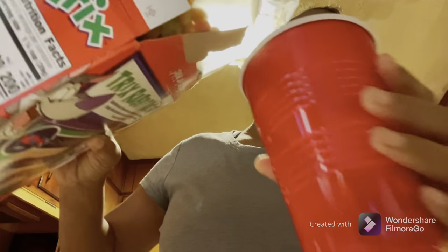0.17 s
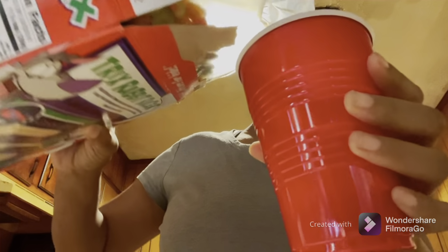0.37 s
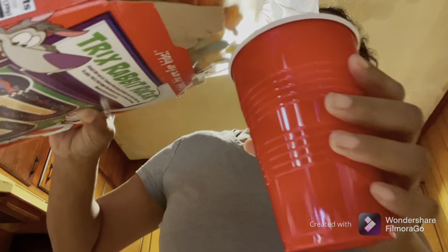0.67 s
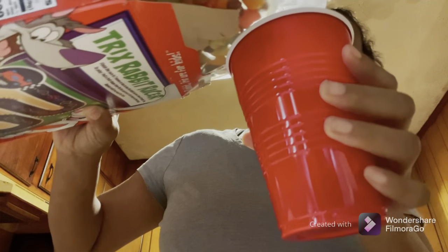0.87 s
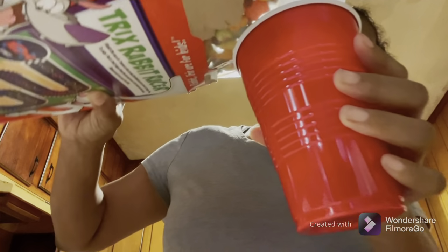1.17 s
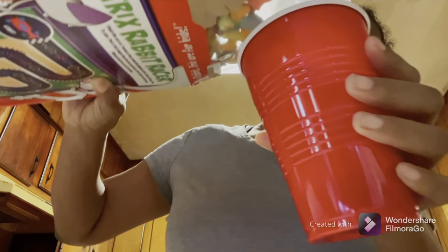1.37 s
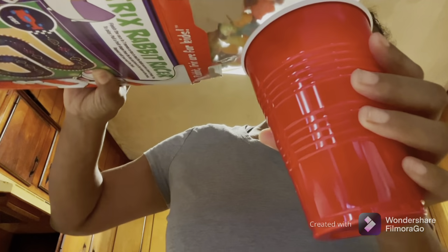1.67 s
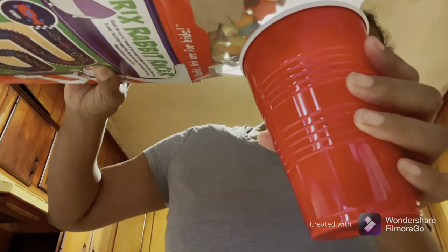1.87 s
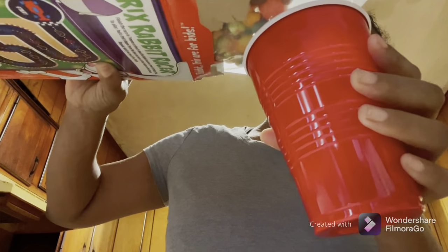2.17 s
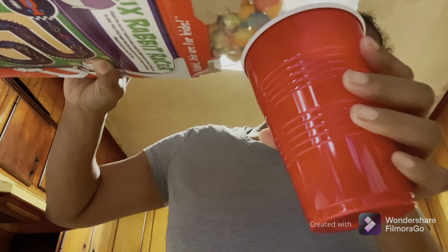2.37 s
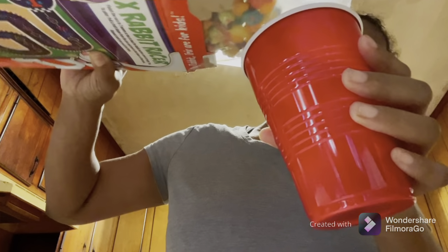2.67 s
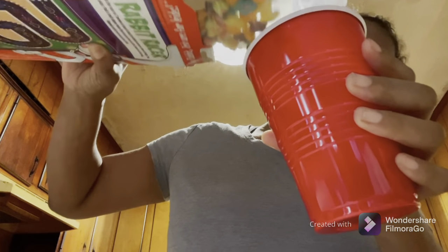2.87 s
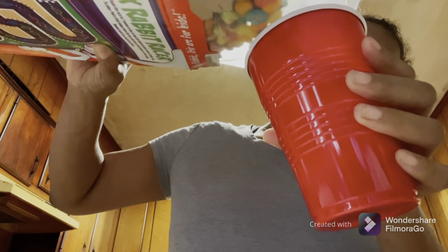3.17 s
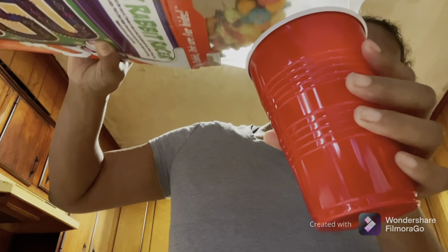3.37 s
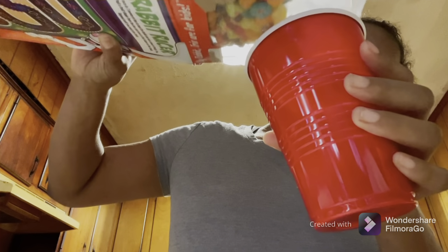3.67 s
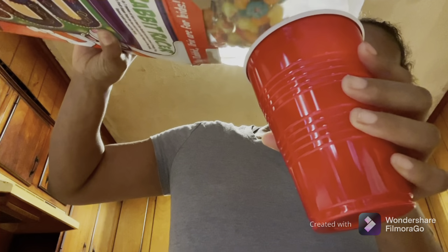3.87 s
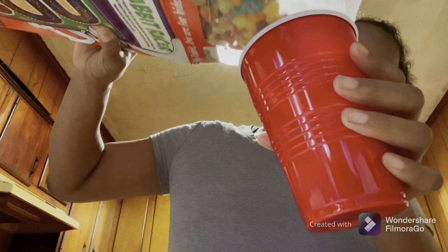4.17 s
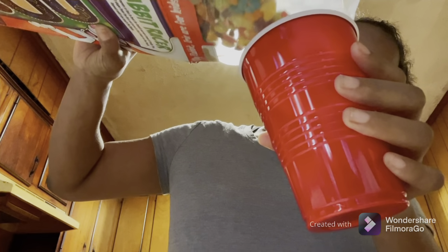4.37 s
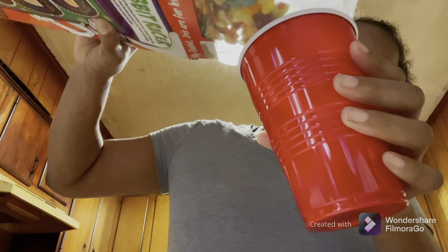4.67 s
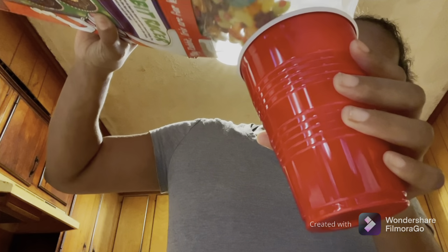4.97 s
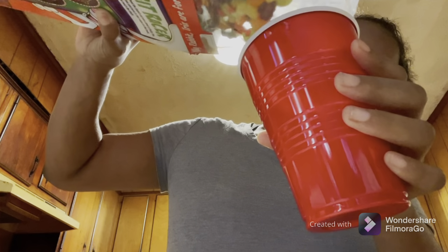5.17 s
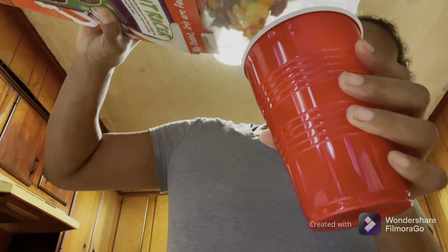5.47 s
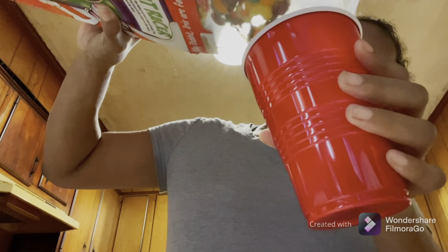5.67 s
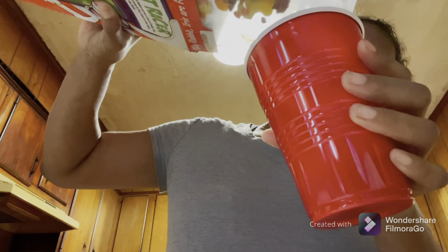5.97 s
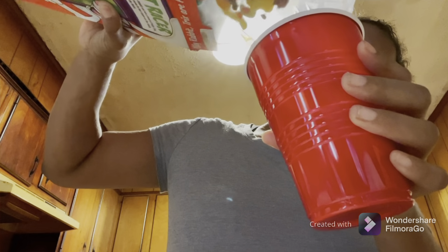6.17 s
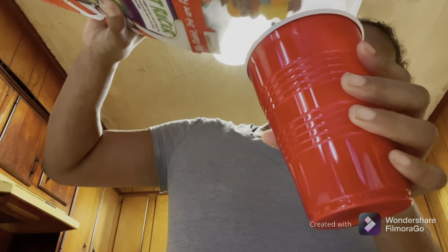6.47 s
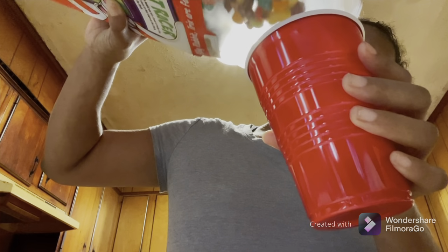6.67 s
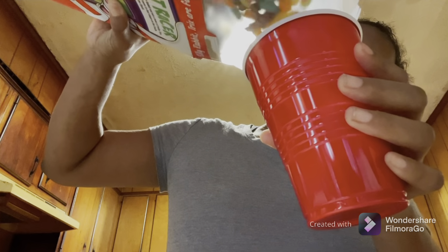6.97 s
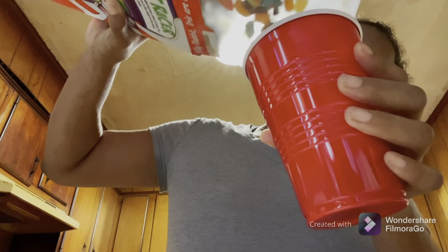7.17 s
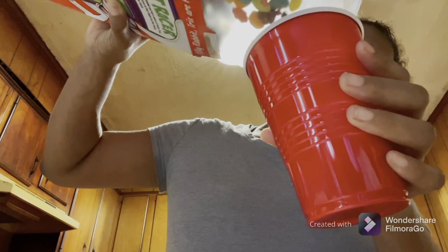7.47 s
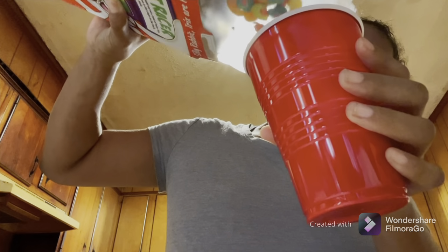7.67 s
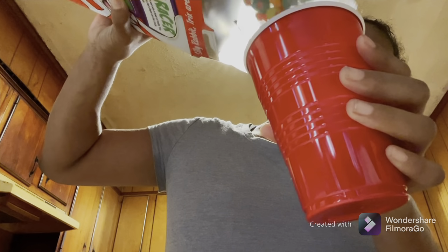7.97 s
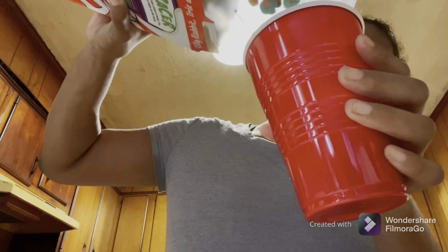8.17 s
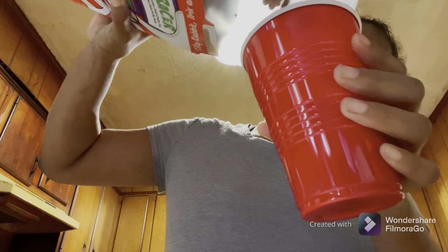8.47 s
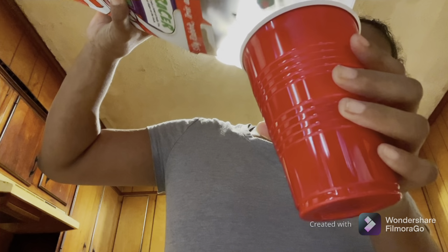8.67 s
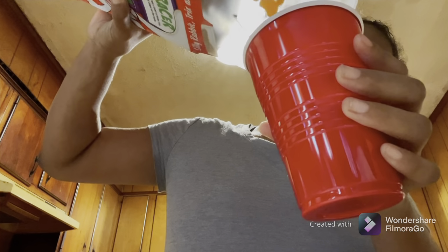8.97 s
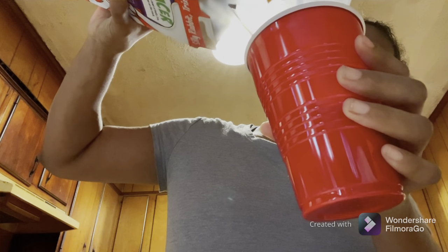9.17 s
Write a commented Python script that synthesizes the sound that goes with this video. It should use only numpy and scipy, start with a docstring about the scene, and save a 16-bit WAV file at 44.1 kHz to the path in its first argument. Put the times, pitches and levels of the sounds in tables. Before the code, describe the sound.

Soft, grainy slides of dry cereal in cardboard come first, with pauses between. Then a few pieces hit an empty plastic cup, hollow and bright, pause briefly, and pour in thick clattering bursts. The sound turns duller and drier on the growing heap, thinning to a quieter uneven trickle while the plastic liner rustles and cracks. Close stereo microphone, pour leaning right, short kitchen reflections, low hum underneath.

```python
"""Cereal pours from a tipped box into a thin plastic cup, close to the microphone.
Each piece is a burst of tiny cracks plus the ringing cup; as the heap grows, the ring fades to dry clicks.
Small pieces patter along. Before the pour, the box tips in short and long slides of filtered noise.
The liner rustles (grainy noise) and snaps (short cracks), in a small kitchen with still air and a low hum."""
import sys
import numpy as np
from scipy import signal
from scipy.fft import rfft, irfft, next_fast_len
from scipy.io import wavfile
from scipy.ndimage import uniform_filter1d

SR = 44100
rng = np.random.default_rng(int(sys.argv[2]) if len(sys.argv) > 2 else 0)


def digitize_waveform(pressure):
    """Quantize a signal to 16-bit integers and store it at the path in sys.argv[1].

    Rows of a 2-D input are taken as channels; values are limited to [-1, 1].
    """
    field = np.atleast_2d(pressure).T
    bounded = np.clip(field, -1, 1)
    quanta = np.round(bounded * 32767).astype(np.int16)
    wavfile.write(sys.argv[1], SR, quanta)


N = 411012
TIME = np.arange(N) / SR  # seconds

# Strength of the pour over time, before the trims in the functions that use it:
# t/s, rumble level/dB, crinkle level/dB
FLOW = [(3.03, -45, -54), (3.14, -40, -61), (3.27, -44, -40), (3.48, -39, -44.5), (3.69, -42.5, -55.5),
        (4.1, -51.5, -62.5), (4.28, -41, -49.5), (4.4, -41, -43.5), (4.9, -38.5, -45), (5.02, -41.5, -44),
        (5.25, -34, -36), (5.56, -40, -57), (5.66, -32.5, -37.5), (6.05, -37.5, -39.5), (6.32, -43.5, -51),
        (6.7, -51, -59), (6.92, -44.5, -56.5), (7.2, -32.5, -37.5), (7.38, -38.5, -44),
        (7.52, -32.5, -35.5), (7.72, -47, -58), (7.98, -42, -52), (8.24, -35.5, -43), (8.54, -42, -50),
        (8.8, -37, -44), (9.32, -46, -51)]
POUR_START_S = FLOW[0][0]


def amp(db):
    """Turns decibels into gain."""
    return 10 ** (np.asarray(db) / 20)


def unit(x):
    """Scales a sound to rms 1."""
    return x / np.sqrt(np.mean(x ** 2) + 1e-20)


def peak(x, size=132):
    """Finds the rms of the loudest three milliseconds of each row."""
    power = uniform_filter1d(x ** 2, size, axis=1, mode="constant")
    return np.sqrt(power.max(1, keepdims=True) + 1e-20)


def read(points, hz):
    """Reads a curve between its points, along a log-frequency axis."""
    f, value = np.transpose(points)
    return np.interp(np.log(hz + 1), np.log(f + 1), value)


def add(mix, s, sound):
    """Adds a sound to the stereo mix at time s, cutting off what runs past the end."""
    part = mix[:, max(round(s * SR), 0):][:, :sound.shape[1]]
    part += sound[:, :part.shape[1]]


def colour(x, points, size=2048):
    """Filters each row to the given spectrum, with no sound ahead of its cause (minimum phase)."""
    hz = abs(np.fft.fftfreq(size, 1 / SR))
    log_gain = np.log(amp(read(points, hz)))
    response = np.exp(np.conj(signal.hilbert(log_gain)))
    taps = np.fft.ifft(response).real[:size // 2]
    return signal.oaconvolve(x, taps[None], axes=1)[:, :x.shape[1]]


def band(x, edges, kind="band", order=4):
    """Keeps one range of frequencies with a Butterworth filter."""
    return signal.sosfilt(signal.butter(order, edges, kind, fs=SR, output="sos"), x)


def background(air_db=-56, waver=0.33, apart=0.97):
    """Still air is coloured noise; an appliance hums in low tones that waver in level and phase."""
    # colour of the kitchen air: f/Hz, level/dB
    air_colour = [(26, -51), (45, -3), (58, -5), (80, -4.5), (120, -11), (250, -16.5), (500, -18),
                  (1000, -29), (1500, -35), (2000, -43), (2600, -47), (5000, -42), (10000, -51),
                  (16000, -53)]
    # low hum: f/Hz, level/dB
    hum_tones = [(59.3, -53.5), (120, -65.5), (240.5, -63)]
    noise = rng.standard_normal((3, N))
    shared_and_separate = noise[0] + apart * noise[1:]
    out = amp(air_db) * unit(colour(shared_and_separate, air_colour, size=16384))
    knots = np.arange(0, TIME[-1] + 1, .1)  # a new drift target every 0.1 s
    for hz, db in hum_tones:
        targets = rng.standard_normal(len(knots)) + 1j * rng.standard_normal(len(knots))
        drift = np.interp(TIME, knots, targets)
        tone = ((1 + waver * drift) * np.exp(2j * np.pi * hz * TIME)).real
        out = out + amp(db) * unit(tone)
    return out


def kitchen(pair, room_db, first_s=0.0053, absorb_hz=8000, size=20000):
    """Dense reflections off cupboards and walls differ at each port; treble is softened as well."""
    # time for the echoes to die by 60 dB: f/Hz, t60/s
    decay_times = [(200, 0.067), (800, 0.12), (4000, 0.15), (12000, 0.085)]
    echo_here = rng.standard_normal((2, size))
    taps = echo_here * (rng.random((2, size)) < 3000 / SR) * (np.arange(size) > first_s * SR)
    hz, t, z = signal.stft(taps, SR, nperseg=128)
    fade = amp(-60 * t / read(decay_times, hz)[:, None])
    tail = signal.istft(z * fade, SR, nperseg=128)[1]
    tail = band(tail / np.linalg.norm(tail, axis=1, keepdims=True), absorb_hz, "low", order=1)
    return pair + amp(room_db) * signal.oaconvolve(pair, tail, axes=1)[:, :N]


def ports(pair, shade=1):
    """Sound from the side reaches the right microphone port sooner and louder; shade scales the dB gap."""
    # phase by which the left port leads (negative: it lags): f/Hz, phase/rad
    port_phase = [(20, 0), (600, -.7), (950, -1.65), (2070, -2.8), (3400, -5.3), (4650, -5.9), (5500, -8.6),
                  (7500, -9.1), (11300, -6.5), (13700, -6.1), (16400, -3.6)]
    # left minus right, before shade: f/Hz, level/dB
    port_balance = [(60, 0), (200, -5), (380, -7.5), (700, -6), (1290, -6.2), (2380, -2), (4400, -4),
                    (8100, -1), (15000, 0)]
    hz = np.fft.rfftfreq(next_fast_len(N + 4096), 1 / SR)
    size = 2 * (len(hz) - 1)
    ratio = amp(shade * read(port_balance, hz))
    left = ratio * np.exp(1j * read(port_phase, hz))
    right = np.ones(len(hz))
    gains = np.array([left, right]) * np.sqrt(2 / (1 + ratio ** 2))  # keeps the total power
    return irfft(rfft(pair, size) * gains, size)[:, :N]


def grains(per_s, spread_db, hiss, grain_s, size=600):
    """A shower of tiny scrapes of uneven size lies over a smooth rub."""
    starts = rng.random(N) < per_s / SR
    sizes = amp(spread_db * np.minimum(rng.exponential(1, N), 3.5)) * starts
    age = np.arange(size) / SR / grain_s
    power = signal.oaconvolve(sizes ** 2, (age * np.exp(-age)) ** 2)[:N]
    return np.sqrt(abs(power) / power.mean() + hiss ** 2) * rng.standard_normal((1, N))


def sliding(levels, drive, rumble_db, crinkle_db, shape, lowest_hz=90, split_hz=1500):
    """Moving cereal drums on the cardboard (low band) and crinkles the liner (high band)."""
    rumble, crinkle = levels
    rustle = colour(drive, shape)
    low = unit(band(rustle, (lowest_hz, split_hz), order=3)) * amp(rumble_db) * rumble
    high = unit(band(rustle, split_hz, "high", order=3)) * amp(crinkle_db) * crinkle
    return low + high


def tipping_levels(attack_s=0.0043, release_s=0.041, arch_db=4):
    """As the box tips, each slide catches quickly, follows a swell and an arch, then runs out."""
    # slides in the box, levels before the trims in scene():
    # start t/s, length/s, rumble level/dB, crinkle level/dB, swell from start to end/dB
    box_slides = [(0.01, 0.012, -69, -67, -12), (0.16, 0.037, -80, -70.5, -4),
                  (0.235, 0.17, -60, -67.5, -12), (0.402, 0.53, -38, -54, 5), (1.0, 0.29, -54.5, -76, 7.5),
                  (1.338, 0.11, -50, -71, 6), (1.668, 0.052, -47, -63, -4), (1.877, 0.47, -42.5, -59, 8.5),
                  (2.668, 0.024, -54, -68.5, -6), (2.768, 0.034, -55, -68.5, 0), (2.852, 0.35, -50, -64, 3)]
    out = np.zeros((2, N))
    for start, length, rumble_db, crinkle_db, swell_db in box_slides:
        t = np.arange(0, length + 10 * release_s, 1 / SR)
        along = np.minimum(t / length, 1)  # 0 at the start, 1 at the end
        hold = amp(swell_db * (along - .5) + arch_db * (np.sin(np.pi * along) - 1.0))
        edges = np.minimum(t / attack_s, 1) * np.exp(-np.maximum(t - length, 0) / release_s)
        add(out, start, amp([[rumble_db], [crinkle_db]]) * hold * edges)
    return out


def flow(s):
    """The pour drives a rumble and a crinkle, given here in dB at the times s."""
    at, rumble_db, crinkle_db = np.transpose(FLOW)
    return np.interp(s, at, rumble_db), np.interp(s, at, crinkle_db)


def pouring_levels(start_s=0.041):
    """Once cereal runs out of the box, the flow sets the gains of rumble and crinkle."""
    return amp(flow(TIME)) * np.clip((TIME - POUR_START_S) / start_s, 0, 1)


def snaps(buckle_s=.001, size=1200):
    """A crease in the liner buckles: a brief, bright crack with no ring."""
    # dry snaps of the liner: t/s, level/dB
    snap_times = [(0.993, -45.5), (1.022, -51), (1.238, -51), (1.343, -53), (1.441, -52), (1.658, -48),
                  (2.177, -42), (2.346, -43), (3.059, -37), (3.128, -24), (3.489, -28), (3.771, -24.5),
                  (4.285, -25.5), (5.083, -18.5), (5.429, -23.5), (5.546, -25.5), (5.801, -31),
                  (5.971, -27), (6.115, -27.5), (6.174, -22.5), (6.264, -26), (6.381, -23), (6.456, -25.5),
                  (6.576, -28), (6.742, -32), (6.816, -25), (6.943, -35.5), (7.024, -27.5), (7.265, -22),
                  (7.28, -21.5), (7.334, -23.5), (7.46, -25), (7.826, -28), (7.966, -32), (8.061, -27.5),
                  (8.184, -27.5), (8.247, -24.5), (8.33, -26.5), (8.378, -26.5), (8.687, -26),
                  (8.706, -26.5), (8.801, -32), (8.897, -30), (8.944, -32), (9.086, -28)]
    # colour of a snap: f/Hz, level/dB
    snap_colour = [(150, -6), (700, 1), (1400, -10), (2100, 1.5), (4200, -2), (7500, 3), (10600, -5.5),
                   (14000, -15.5), (16000, -14)]
    s, level_db = np.transpose(snap_times)
    age = np.arange(size) / SR / (buckle_s * 2 ** (rng.random((len(s), 1)) - .5))
    cracks = colour(rng.laplace(size=(len(s), size)) * age * np.exp(-age), snap_colour)
    out = np.zeros((2, N))
    for start, crack in zip(s, amp(level_db)[:, None] * cracks / peak(cracks)):
        add(out, start, crack[None])
    return out


def patter(count=260, knock_trim_db=0, clack_trim_db=3, spread_db=4.5):
    """Small pieces fall at random all through the pour, as hard as the flow drives them."""
    turn = (np.arange(count) + rng.random(count)) / count  # one in each equal slice of time
    s = POUR_START_S + turn * (TIME[-1] - POUR_START_S)
    weight, hardness = spread_db * (2 * rng.random((count, 2)).T - 1)
    rumble_db, crinkle_db = flow(s)
    knock_db = rumble_db + knock_trim_db + weight - hardness
    clack_db = crinkle_db + clack_trim_db + weight + hardness
    return np.transpose([s, knock_db, clack_db])


def cup_ring(t, count, flex=0.0096, flex_hz=1500):
    """The spot struck sets each mode's sign and strength; the soft wall detunes it, high modes most."""
    # ringing modes of the cup, before detuning: f/Hz, level/dB, t60/s
    cup_modes = [(355, 0.5, 0.042), (460, -0.5, 0.026), (537, -37, 0.034), (673, -7.5, 0.26),
                 (736, 8, 0.037), (788, -6, 0.14), (941.4, 1, 0.048), (1010, 8, 0.023), (1164, 1, 0.034),
                 (2013, 16, 0.0066), (2380, -7, 0.042), (3068, -9.5, 0.061), (3217, -3.5, 0.031),
                 (3995, 5, 0.039), (4130, -38, 0.022), (4520, -5, 0.048), (5090, 4.5, 0.028),
                 (5700, -6, 0.054)]
    draws = rng.uniform(-0.724, 1, (count, len(cup_modes), 2))
    ring = 0
    for k, (hz, db, t60) in enumerate(cup_modes):
        spot = draws[:, k, :1]
        detune = draws[:, k, 1:] * flex * (1 + hz / flex_hz)
        wave = np.sin(np.float32(2 * np.pi * hz * (1 + detune) * t))
        ring = ring + np.cbrt(spot) * amp(db - 60 * t / t60) * wave
    return ring


def settling(blows, t, per_s=300, settle_s=0.018, dull_hz=7000):
    """A landing piece knocks its neighbours about: a quick, dying rattle of duller blows."""
    hits = rng.random(blows.shape) < per_s / SR
    knocks = rng.standard_normal(blows.shape) * hits * np.exp(-t / settle_s)
    neighbours = np.roll(blows, 1, axis=0)  # borrows the sound of another piece
    rattle = signal.fftconvolve(neighbours, knocks, axes=1)[:, :len(t)]
    return band(rattle, dull_hz, "low", order=1)


def pieces(rows, contact_s=0.0015, rebound=0.52, rebound_s=0.00676, heap_bounce=0.16, cup_bounce=0.38,
           spread_db=5.0, size=3400):
    """Each piece crunches, rebounds, rings the cup and sets the others rattling."""
    # knock, clack and tick bands: low edge f/Hz, high edge f/Hz
    band_edges = [(270, 1500), (1500, 6500), (6500, 16000)]
    # how freely the cup rings as the heap grows: t/s, level/dB
    ring_freedom = [(2.0, -17), (3.1, -19), (3.17, 2.5), (4.4, 1), (5.2, 3), (5.8, -6.5), (6.5, -16.5),
                    (7.2, -18), (9.3, -39)]
    # colour of a piece landing on the heap: f/Hz, level/dB
    heap_colour = [(100, -7), (300, -12.5), (500, -2.5), (690, -1), (950, -2), (1500, -14), (2050, -6),
                   (2800, -11), (4200, -9), (7000, -10), (10500, -8), (13000, -17), (16000, -22)]
    knock_trim_db, clack_trim_db = -1.86, -0.1
    tick_trim_db, cushion_db = -4.5, -13.5  # tick relative to clack; change on the springy cup wall

    s, knock_db, clack_db = np.transpose(rows)
    t = np.arange(size) / SR
    softness, wait, bounce, side = rng.random((len(s), 4)).T[:, :, None]
    contact = contact_s * 2 ** (softness - .5)
    first = t / contact
    second = np.maximum(t - rebound_s * (wait + 0.31), 0) / contact
    force = first * np.exp(1 - first) + rebound * bounce * second * np.exp(1 - second)
    grit = rng.laplace(size=(len(s), size))  # the puffed crust gives way in tiny uneven cracks
    crunch = colour(grit * force, heap_colour)
    ring = cup_ring(t, count=len(s)) * (1 - np.exp(-first))  # the wall swings up during the contact

    freedom = amp(np.interp(s, *np.transpose(ring_freedom)))[:, None]
    blows = crunch / peak(crunch) + freedom * ring / peak(ring)
    blows /= peak(blows)
    # share of the blow taken by bare plastic, which throws pieces back; the heap holds them
    bare = freedom / (1 + freedom)
    blows = blows + (heap_bounce + cup_bounce * bare) * settling(blows, t)

    tick_db = clack_db + tick_trim_db + cushion_db * bare[:, 0]
    band_levels = (knock_db + knock_trim_db, clack_db + clack_trim_db, tick_db)
    sounds = 0
    for edges, level_db in zip(band_edges, band_levels):
        part = band(blows, edges)
        sounds = sounds + amp(level_db)[:, None] * part / peak(part)
    out = np.zeros((2, N))
    for start, sound, pan in zip(s, sounds, 2 * side - 1):
        stereo_gain = amp(spread_db * pan * np.array([[1], [-1]]))
        add(out, start, stereo_gain * sound)
    return out


def scene():
    """The box tips, then the cereal pours into the cup."""
    # loudest pieces striking box, heap or cup, before the trims in pieces():
    # t/s, knock level/dB, clack level/dB
    loud_pieces = [(0.597, -31, -43.5), (0.635, -37, -54), (0.734, -32, -43), (0.916, -41, -55),
                   (1.374, -38.5, -50.5), (1.919, -34.5, -52), (2.039, -37, -56), (3.087, -26, -29.5),
                   (3.139, -30, -27.5), (3.166, -6, -18.5), (3.185, -14.5, -47), (3.199, -16, -22.5),
                   (3.265, -11.5, -44), (3.291, -13, -25.5), (3.311, -16.5, -29), (3.354, -20, -24.5),
                   (3.368, -23.5, -30), (3.43, -20.5, -30), (3.489, -25, -29), (3.522, -14, -24),
                   (3.543, -20, -22), (3.584, -22, -42), (3.632, -18.5, -27), (3.808, -12, -23.5),
                   (3.879, -19.5, -29.5), (3.899, -28, -28), (4.321, -8.5, -14.5), (4.376, -14.5, -31),
                   (4.392, -19, -25), (4.424, -26, -34), (4.482, -9, -22.5), (4.497, -12, -15),
                   (4.546, -14, -27), (4.579, -24, -26), (4.615, -10, -18.5), (4.65, -16, -27),
                   (4.695, -18, -29), (4.719, -17, -24.5), (4.774, -13, -16), (4.812, -18, -24),
                   (4.829, -14.5, -23.5), (4.857, -10.5, -15), (4.876, -10, -16), (4.898, -12.5, -19.5),
                   (4.95, -20.5, -28.5), (5.041, -8, -17.5), (5.134, -15.5, -24.5), (5.164, -13.5, -19),
                   (5.173, -17, -16.5), (5.189, -21, -30), (5.229, -13, -22), (5.306, -15, -23),
                   (5.349, -26.5, -33), (5.45, -12.5, -18), (5.522, -29, -27), (5.61, -16, -21.5),
                   (5.636, -26, -24.5), (5.655, -16.5, -26), (5.698, -20.5, -24.5), (5.734, -12, -19),
                   (5.747, -15, -19), (5.814, -16.5, -23), (5.848, -18, -25), (5.879, -25, -22),
                   (5.889, -23, -20.5), (5.933, -26, -22), (5.946, -15, -27), (6.002, -18.5, -24.5),
                   (6.015, -25, -24), (6.064, -25, -29.5), (6.147, -25, -31.5), (6.184, -18.5, -28),
                   (6.221, -21.5, -28.5), (6.264, -29, -29), (6.323, -22.5, -30.5), (6.466, -13.5, -20),
                   (6.529, -27.5, -41), (6.587, -21, -29.5), (7.0, -25.5, -34.5), (7.009, -26, -28),
                   (7.072, -26.5, -33.5), (7.114, -27, -28.5), (7.157, -30.5, -43), (7.184, -20, -34),
                   (7.207, -23, -27), (7.251, -27, -34), (7.299, -25, -26), (7.311, -19.5, -26.5),
                   (7.35, -26, -35), (7.421, -28, -42), (7.445, -29, -30.5), (7.487, -31, -33),
                   (7.516, -24.5, -36), (7.585, -22.5, -26), (7.621, -23.5, -24.5), (7.858, -26, -30),
                   (7.892, -27, -36.5), (8.024, -29, -23), (8.065, -27, -32), (8.139, -29.5, -43.5),
                   (8.163, -28.5, -28), (8.228, -25, -23), (8.301, -41, -30.5), (8.414, -29, -28.5),
                   (8.441, -25.5, -26.5), (8.467, -27.5, -34), (8.579, -30.5, -32), (8.605, -31, -32),
                   (8.741, -22, -33.5), (8.758, -26.5, -27), (8.862, -29, -29.5), (8.906, -28, -26.5),
                   (9.019, -28.5, -33.5), (9.128, -32, -32.5), (9.186, -32, -35.5), (9.286, -28.5, -30)]
    # colour of cereal sliding in the box: f/Hz, level/dB
    slide_colour = [(70, -14), (130, -1), (250, 0), (380, 1), (520, -5), (1050, -6), (1500, -15),
                    (2000, -12), (2800, -23), (5000, -20.5), (7500, -21.5), (10800, -24.5), (13000, -30.5),
                    (16000, -34)]
    # colour of cereal streaming over the liner: f/Hz, level/dB
    stream_colour = [(90, -6), (150, -2.5), (280, -2), (520, -0.5), (690, 6.5), (900, 1.5), (1450, -9),
                     (2050, -5.5), (2800, -13.5), (4200, -11.5), (7000, -19.5), (10500, -15),
                     (13000, -20.5), (16000, -26)]
    shuffle = grains(per_s=900, spread_db=3.8, hiss=.35, grain_s=.0004)
    trickle = grains(per_s=260, spread_db=4.5, hiss=.2, grain_s=.0007)
    tipping = sliding(tipping_levels(), shuffle, rumble_db=0.5, crinkle_db=6.0, shape=slide_colour)
    pouring = sliding(pouring_levels(), trickle, rumble_db=-1.5, crinkle_db=-2.0, shape=stream_colour)
    landings = pieces(np.vstack([loud_pieces, patter()]))
    cup = kitchen(ports(landings + snaps()), room_db=-12)
    box = kitchen(ports(tipping + pouring, shade=0.62), room_db=-4.5)
    return cup + box + background()


def record(dry, edge_hz=16100):
    """Peaks are cut at full scale, then the sound above the band edge is filtered away."""
    taps = signal.firwin(401, edge_hz, window=("kaiser", 8), fs=SR)
    return signal.oaconvolve(np.clip(dry, -1, 1), taps[None], "same")


dry = scene()
out = record(dry)
digitize_waveform(out)
```